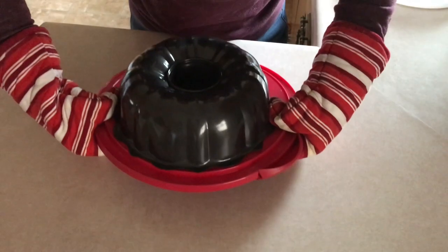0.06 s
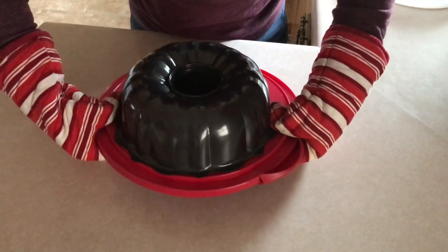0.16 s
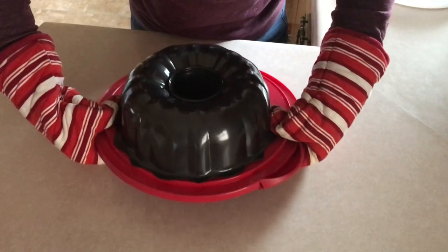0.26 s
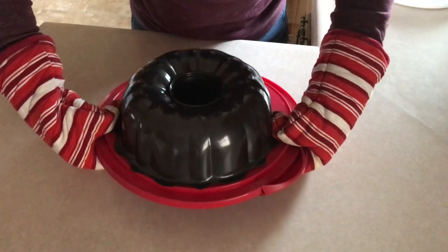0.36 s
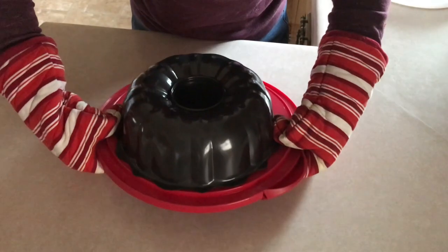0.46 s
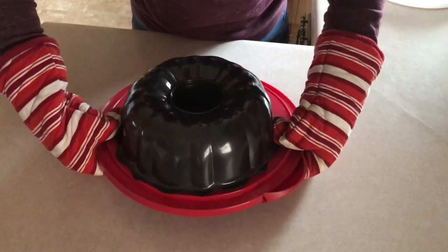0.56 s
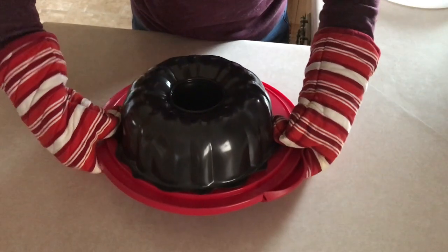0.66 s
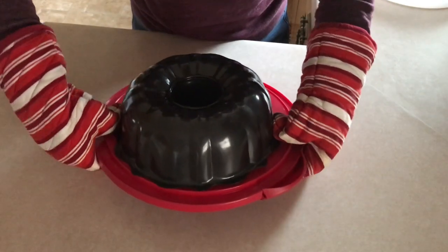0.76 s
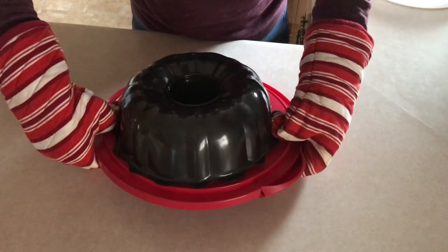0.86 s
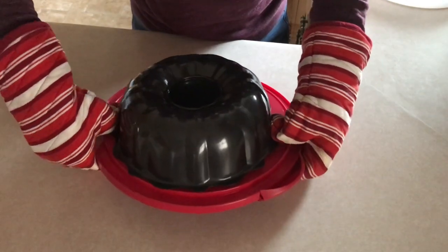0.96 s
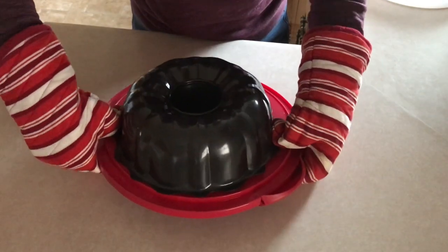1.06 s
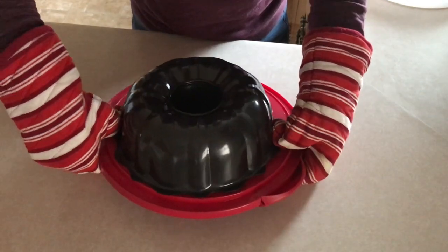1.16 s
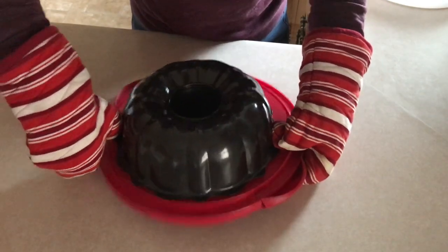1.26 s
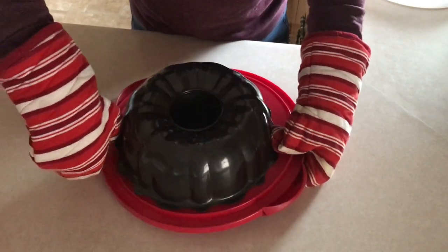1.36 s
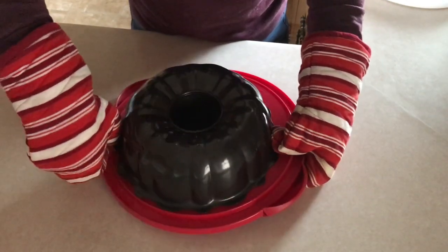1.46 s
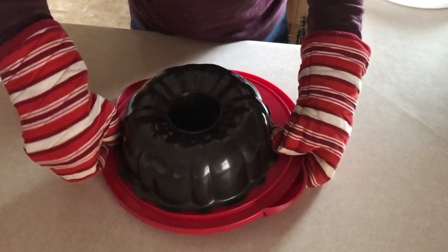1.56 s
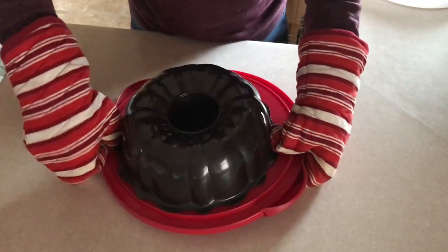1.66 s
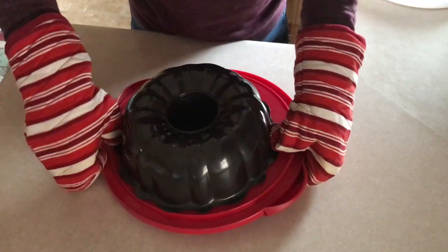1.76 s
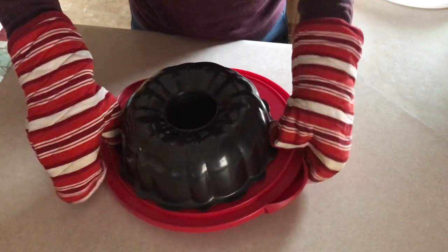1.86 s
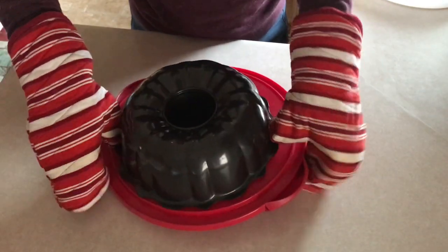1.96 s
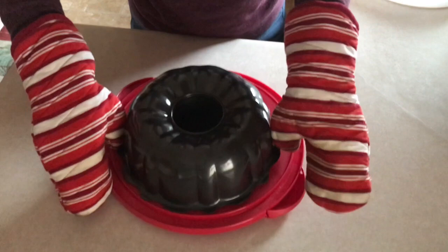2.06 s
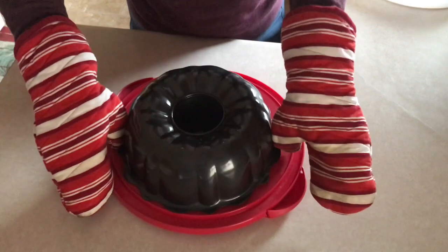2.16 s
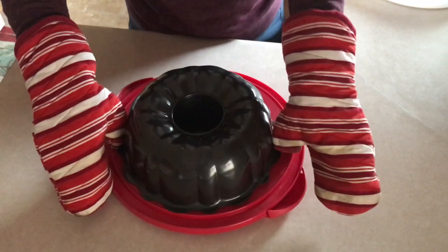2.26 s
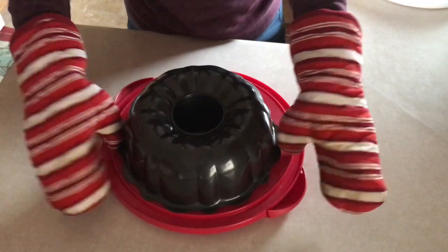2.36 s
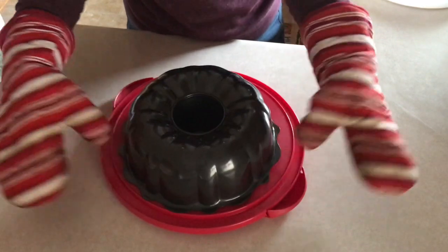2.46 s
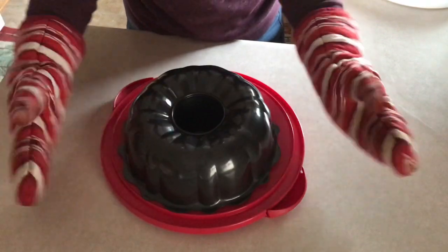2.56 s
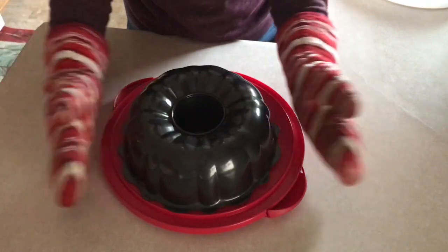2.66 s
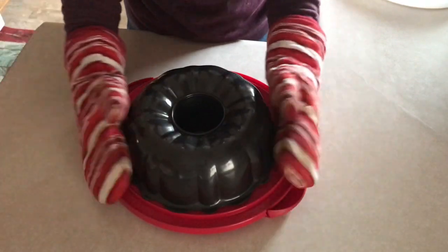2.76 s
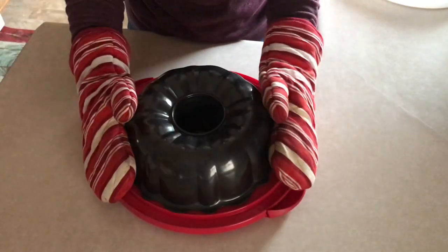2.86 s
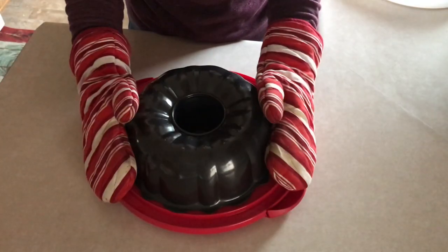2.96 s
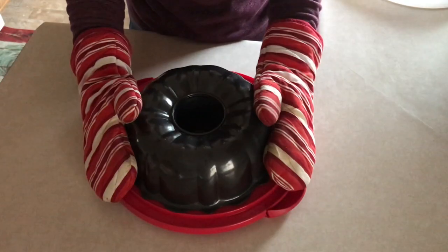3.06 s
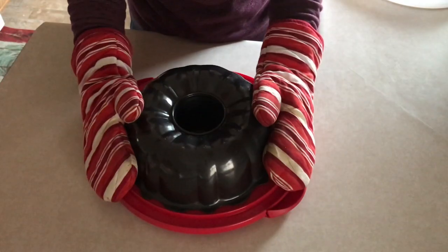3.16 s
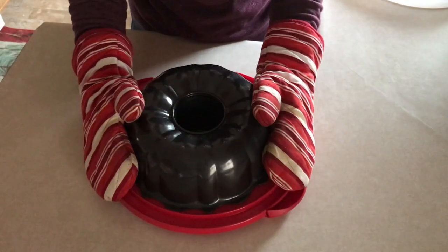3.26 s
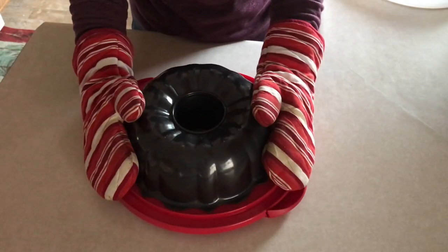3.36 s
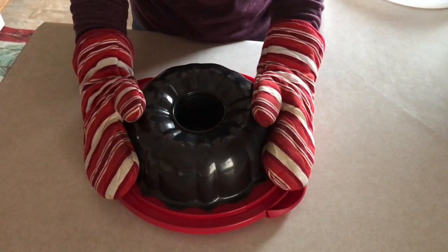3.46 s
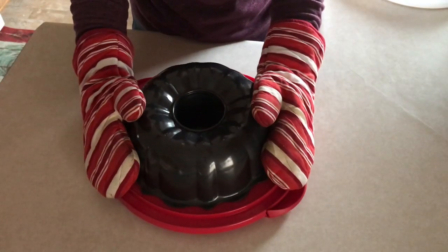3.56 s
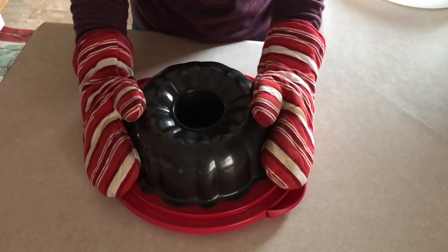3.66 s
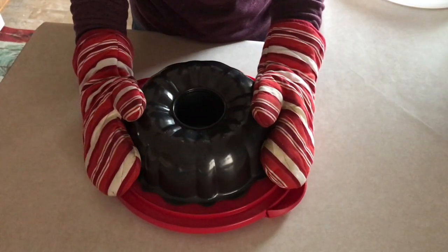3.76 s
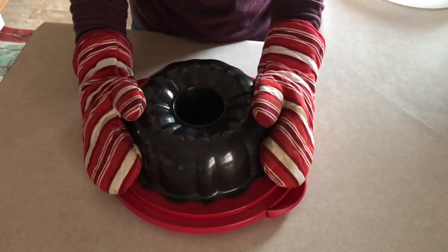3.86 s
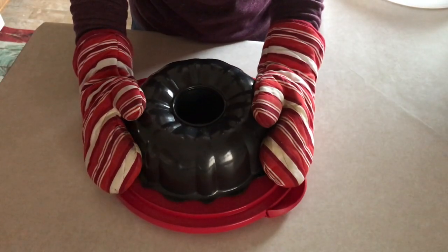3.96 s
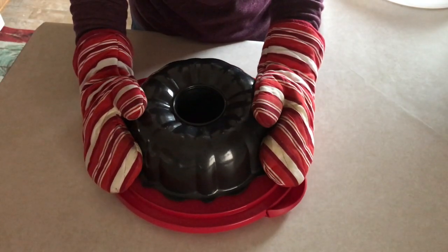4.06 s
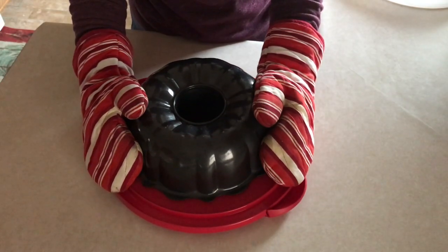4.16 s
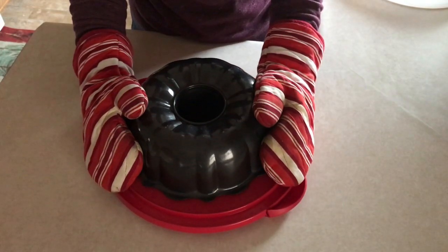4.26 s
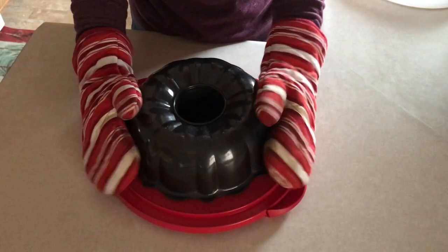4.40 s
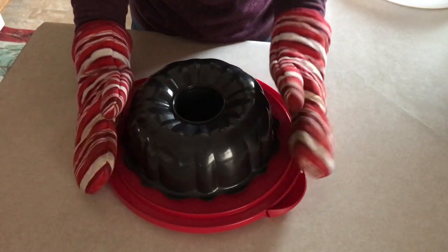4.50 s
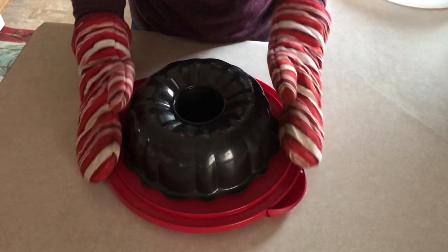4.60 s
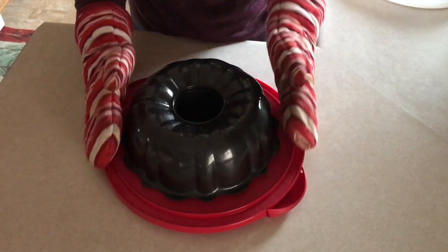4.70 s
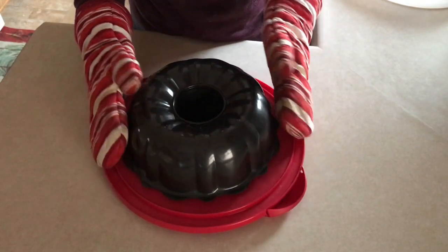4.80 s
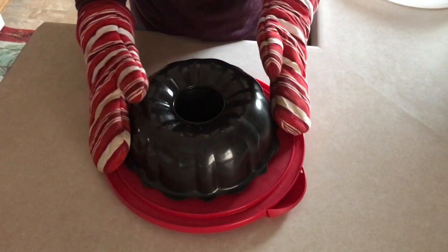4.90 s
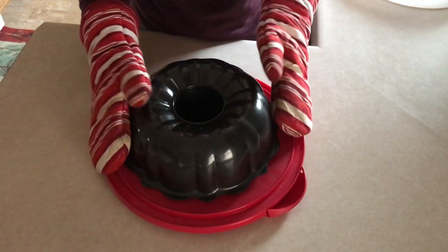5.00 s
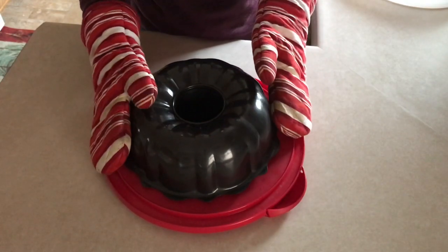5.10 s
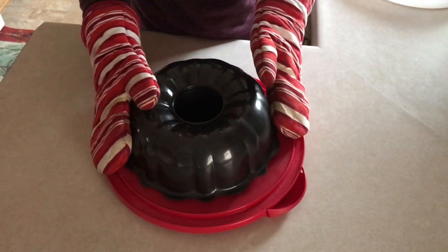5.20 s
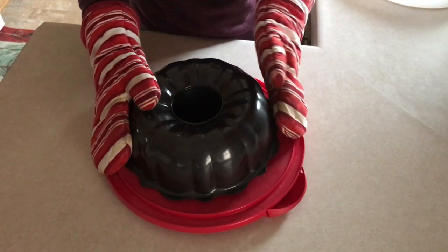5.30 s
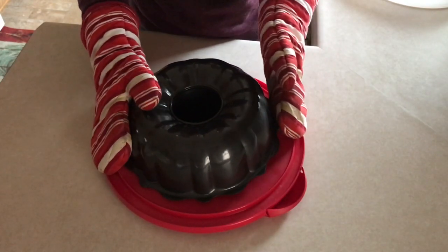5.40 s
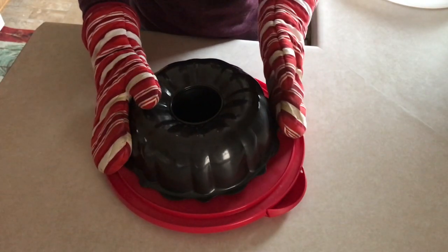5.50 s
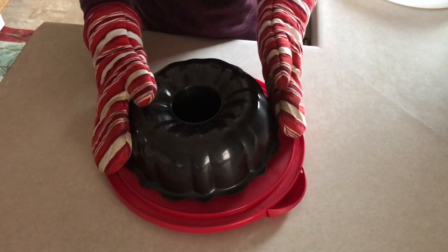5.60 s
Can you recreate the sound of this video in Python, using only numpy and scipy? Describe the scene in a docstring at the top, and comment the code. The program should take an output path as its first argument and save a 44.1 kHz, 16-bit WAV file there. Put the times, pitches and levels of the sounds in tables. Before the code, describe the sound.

A fluted metal cake pan on a plastic lid knocks down onto a papered counter, clatters, drops flat loudly, then faint mitt rustling follows.

```python
"""A fluted metal cake pan, upside down on a plastic lid, is lowered onto a paper-covered kitchen counter.
One edge knocks down, the lid clatters after it, then the pan drops flat as oven mitts slide out from under its rim.
Knocks and touches are band-limited pushes with chatter, ringing the modes of lid and pan; thuds also ring the counter.
Mitts and lid rub over the paper, and cloth sizzles on the pan, as random grains of friction.
The kitchen's echo is noise following the decaying energy of each band; a low rumble is filtered noise."""
import sys
import numpy as np
from scipy import signal
from scipy.fft import rfft, irfft
from scipy.io import wavfile

SR = 44100
rng = np.random.default_rng(int(sys.argv[2]) if len(sys.argv) > 2 else 0)


def transcribe(u):
    """Save the signal u as a 16-bit wav file named by the first command-line argument.

    u: samples, shape (n,) or (channels, n), limited to [-1, 1]; the rate is SR.
    q: integer samples, one column per channel.
    """
    v = np.clip(np.atleast_2d(u).T, -1, 1)
    q = np.round(v * 32767).astype(np.int16)
    wavfile.write(sys.argv[1], SR, q)


N = 248724
TIME = np.arange(N) / SR


def from_db(db):
    """Decibels to amplitude gain."""
    return 10 ** (np.asarray(db) / 20)


def rms_one(x):
    """Scale to rms 1."""
    return x / np.sqrt(np.mean(x ** 2) + 1e-20)


def at_hz(points, hz):
    """Interpolate a table on a log-frequency axis."""
    known_hz, values = np.transpose(points)
    return np.interp(np.log(np.maximum(hz, 1)), np.log(known_hz), values)


def coloured(x, colour):
    """Shape a steady sound's spectrum, rolling off beyond both ends of the table; rms 1."""
    hz = np.arange(N // 2 + 1) * SR / N + 1
    low_end = 1 + (colour[0][0] / hz) ** 6
    high_end = 1 + (hz / colour[-1][0]) ** 6
    gain = from_db(at_hz(colour, hz)) / np.sqrt(low_end * high_end)
    return rms_one(irfft(rfft(x) * gain, N))


def band(x, low_hz, high_hz):
    """Second-order high-pass and low-pass."""
    for edge_hz, kind in ((low_hz, "high"), (high_hz, "low")):
        safe_hz = np.clip(edge_hz, 10, .45 * SR)
        x = signal.sosfilt(signal.butter(2, safe_hz, kind, fs=SR, output="sos"), x)
    return x


def drift(rate_hz):
    """Random line through rate_hz points per second; rms 1."""
    points = rng.standard_normal(1024)
    return rms_one(np.interp(TIME * rate_hz, np.arange(len(points)), points))


def ring(force, modes):
    """Decaying modes set off by a force; each starts with a jump in speed."""
    out = np.zeros(N)
    for hz, db, t60_s in modes:
        radius = np.exp(-np.log(1000) / (t60_s * SR))
        angle = 2 * np.pi * hz / SR
        poles = [1, -2 * radius * np.cos(angle), radius * radius]
        out += from_db(db) * signal.lfilter([.5, 0, -.5], poles, force + 1e-18)
    return out


def add(track, start_s, sound):
    """Mix a short sound in at a time."""
    start = max(round(start_s * SR), 0)
    track[start:start + len(sound)] += sound[:max(N - start, 0)]


def grains(per_s, spread_db):
    """Fibres slip at random, each with its own size; rms 1."""
    size_db = spread_db * np.minimum(rng.exponential(1, N), 4)
    sizes = from_db(size_db) * rng.standard_normal(N)
    return rms_one(sizes * (rng.random(N) < per_s / SR))


def diffuse(x, colour, t60s, build_s):
    """Countless echoes or modes: each band stores its energy and gives it back, dying, as noise."""
    edges_hz = np.geomspace(50, 17000, 25)
    white = rng.standard_normal((2, N))   # neighbouring bands alternate
    out = np.zeros(N)
    for k, (low_hz, high_hz) in enumerate(zip(edges_hz, edges_hz[1:])):
        sos = signal.butter(2, [low_hz, high_hz], "band", fs=SR, output="sos")
        centre_hz = np.sqrt(low_hz * high_hz)
        decay_s = at_hz(t60s, centre_hz) / (2 * np.log(1000))   # energy time constant
        energy = signal.sosfilt(sos, x) ** 2
        for seconds in (build_s, decay_s):
            keep = np.exp(-1 / (seconds * SR))
            energy = signal.lfilter([1 - keep], [1, -keep], energy + 1e-20)
        carrier = rms_one(signal.sosfilt(sos, white[k % 2]))
        out += from_db(at_hz(colour, centre_hz)) * np.sqrt(energy) * carrier
    return out


def rumble():
    """Steady noise, strongest in the deep bass."""
    # noise spectrum: f/Hz, relative level/dB
    floor_colour = [(15, -33.5), (25, -7.5), (49, 4.5), (74, 3.5), (166, -12), (317, -12), (503, -24),
                    (1290, -24), (4250, -32), (7710, -41), (8830, -33.5), (10400, -40), (12900, -33.5),
                    (16000, -46.5)]
    level_db = -65.5
    return from_db(level_db) * coloured(rng.standard_normal(N), floor_colour)


def mitts(rub_db, hiss_db, flutter_db):
    """Cloth and plastic drag over paper: a dull rub and a grainy hiss swell and flutter together."""
    # strokes of mitts and lid: middle/s, length/s, rub level/dB re rub_db, hiss above rub/dB before gains
    strokes = [(0.488, 0.34, -73, -9), (0.777, 0.19, -65.5, -11.5), (0.909, 0.43, -66.5, -12),
               (1.299, 0.4, -56.5, -14), (1.83, 0.51, -72.5, -5), (2.114, 0.23, -53, -9),
               (2.342, 0.36, -64, -8), (2.49, 0.099, -72, 4.5), (2.88, .14, -67, -17), (3.2, 0.21, -71, -7),
               (3.4, 0.39, -72.5, -9.5), (3.666, 0.33, -67, -11), (3.905, 0.27, -65, -10.5),
               (4.26, 0.084, -70, -2.5), (4.54, 0.16, -71, -3.5), (4.782, 0.46, -79, -0.5),
               (5.318, 0.29, -72, -7)]
    # spectra of rub and hiss: f/Hz, relative level/dB
    rub_colour = [(130, -14.5), (270, -2), (420, -5.5), (580, -1), (770, -4.5), (1300, -0.5), (2100, -7.5),
                  (3600, -12), (5000, -21)]
    hiss_colour = [(2500, -9), (4300, -1.5), (6500, -5), (9000, -8.5), (10300, -13.5), (13000, -7),
                   (16000, -11)]
    curve = 1.9   # steepness of a stroke's bell
    rub, hiss = from_db(-82.5), from_db(-87.5)   # cloth between strokes, before gains
    for middle_s, length_s, db, above_db in strokes:
        drag = from_db(db) * np.exp(-curve * (2 * (TIME - middle_s) / length_s) ** 2)
        rub = np.hypot(rub, drag)
        hiss = np.hypot(hiss, from_db(above_db) * drag)
    flutter = from_db(flutter_db * drift(rate_hz=62))
    coarse = coloured(grains(per_s=7000, spread_db=2.5), rub_colour)
    fine = coloured(grains(per_s=20000, spread_db=2), hiss_colour)
    return flutter * (from_db(rub_db) * rub * coarse + from_db(hiss_db) * hiss * fine)


def contact(db, hz, spread, chatter_ms, push_db, chatter_db):
    """Push and brief chatter in a steep-sided band; a hard edge gives only highs, a flat landing only lows."""
    t = TIME[:4096]
    chatter = rng.standard_normal(len(t)) * np.exp(-1000 * t / max(chatter_ms, .1))
    blow = from_db(db + push_db) * (t == 0) + from_db(db + chatter_db) * chatter
    edges_hz = hz / spread, hz * spread
    return band(band(blow, *edges_hz), *edges_hz)


def disperse(x):
    """Bending waves arrive late near certain pitches: all-passes smear a push into a short flutter."""
    # late-arriving bands: f/Hz, width/Hz
    bending = [(1050, 600), (3100, 730), (6800, 370)]
    for hz, width_hz in bending:
        radius = np.exp(-np.pi * width_hz / SR)
        poles = np.array([1, -2 * radius * np.cos(2 * np.pi * hz / SR), radius * radius])
        x = signal.lfilter(poles[::-1], poles, x)
    return x


def knocks(push_db, chatter_db, crack_db, ring_db, wash_db):
    """Clicks, thuds and touches drive lid and pan; only thuds carry weight into the counter."""
    # rim click, then thud of the weight: t/s, click level/dB, click f/Hz, thud lag/ms,
    # thud level/dB, thud f/Hz, chatter decay/ms, thud's pan share/dB, thud's counter share/dB
    knock_rows = [ (0.5124, -16.5, 3400, 6.6, 0, 720, 0.45, -35, -17.5),
                  (1.3357, -20, 4500, 0.32, -14.5, 950, 5.2, 7.5, -1),
                  (1.345, -16, 6500, 0.39, -3.5, 860, 2.3, 8, 1.5),
                  (1.368, -15.5, 5500, 2.3, -20.5, 900, 4.6, -20, -4),
                  (1.3755, -4, 4700, 0.85, -5, 950, 1.38, 7, -22.5),
                  (1.388, -9, 3400, 0.98, -4, 809, 0.88, -13, -6.5),
                  (1.4102, -28.5, 3400, 2.4, -15.5, 780, 2.9, -7.5, -0.5),
                  (2.0489, -27, 5500, 2.34, -23.5, 260, 6.3, -13.5, -16.5),
                  (2.106, -24.5, 1400, 9.6, -14.5, 520, 7.5, -10, -8),
                  (2.1215, 5, 6500, 4.5, 2, 1900, 2.4, 4.5, -8.5),
                  (2.127, -1, 3600, 2.0, 2.5, 500, 1.5, 0, 2),
                  (2.1320, -15, 3000, 2.5, -2, 370, 1.16, -3, -2.5),
                  (2.192, -17, 6500, 1.5, -10.5, 260, 2.1, -9, -7),
                  (2.8747, -29.5, 5200, 2.7, -27.5, 520, 1.93, -3.5, -20.5),
                  (4.6900, -42.5, 3300, 5.6, -38.5, 540, 10.5, -8, -14)]
    # light touches of mitt and lid: t/s, force level/dB, f/Hz
    touch_rows = [(0.055, -47.5, 785), (0.127, -62.5, 790), (0.2974, -51, 2540), (1.1545, -42.5, 3180),
                  (1.1806, -35.5, 7050), (1.296, -35, 513), (1.497, -29, 3500), (1.7071, -42.5, 1110),
                  (2.34, -28, 240), (4.516, -40, 1289), (5.5143, -43.5, 210)]
    # modes of loaded lid, cake-damped pan and counter top: f/Hz, relative level/dB, t60/s
    lid_modes = [(268, -19, 0.044), (326, -21.5, .07), (385, -19.5, 0.049), (499, -17.5, 0.036),
                 (622, -17, 0.05), (790, -23, 0.025), (943, -19, 0.024), (1060, -17.5, 0.043),
                 (1150, -19.5, 0.016), (1473, -23.5, 0.035), (1675, -23, 0.041), (1960, -30.5, .018),
                 (2520, -19.5, 0.0092), (3120, -17.5, 0.015), (3484, -22, 0.0077), (4220, -29.5, .01),
                 (5750, -24.5, .008), (6670, -20, 0.0026), (8560, -24, 0.007), (11900, -20.5, 0.0033),
                 (13800, -23, .003)]
    pan_modes = [(328.1, -38.5, 0.24), (410, -43, 0.42), (496, -42.5, 0.17), (622, -44, .24),
                 (1063, -45, 0.26), (1190, -40, 0.27), (1544, -44.5, 0.35), (1960, -47, 0.3),
                 (2080, -46, 0.16), (2940, -44.5, 0.17), (2996, -39.5, .16), (3150, -42.5, 0.18),
                 (3284, -43, .12), (3500, -39.5, 0.23)]
    counter_modes = [(66, -30.5, 0.45), (126.7, -39.5, 0.55), (146.3, -41.5, 0.11), (254, -45.5, 0.028)]
    # pan's crowd of weaker modes: f/Hz, relative level/dB; then f/Hz, t60/s
    wash_colour = [(125, -4), (260, 5), (490, -1), (860, -9.5), (1350, -5.5), (2250, -2.5), (3650, -1.5),
                   (4700, -13), (6800, -12.5), (14500, -16)]
    wash_t60 = [(280, 0.46), (3300, 0.12), (13500, 0.18)]
    # spread: band edges at f / spread and f * spread
    click_spread, thud_spread, touch_spread = 2, 2.1, 2.7
    click_pan_db, touch_pan_db, touch_chatter_ms = -1.5, -5.5, 3

    on_lid, on_pan, on_counter = 1e-12 * rng.standard_normal((3, N))
    contacts = []
    for s, click_db, click_hz, lag_ms, thud_db, thud_hz, chatter_ms, pan_db, counter_db in knock_rows:
        landing_s = s + lag_ms / 1000
        contacts.append((s, click_db, click_hz, click_spread, chatter_ms, click_pan_db))
        contacts.append((landing_s, thud_db, thud_hz, thud_spread, chatter_ms, pan_db))
        add(on_counter, landing_s, from_db([thud_db + counter_db]))
    for s, db, hz in touch_rows:
        contacts.append((s, db, hz, touch_spread, touch_chatter_ms, touch_pan_db))
    for s, db, hz, spread, chatter_ms, pan_db in contacts:
        force = contact(db, hz, spread, chatter_ms, push_db, chatter_db)
        add(on_lid, s, force)
        add(on_pan, s, from_db(pan_db) * force)

    lid = disperse(ring(on_lid, lid_modes) + from_db(crack_db) * on_lid)
    pan_ring = from_db(ring_db) * ring(on_pan, pan_modes)
    pan_wash = from_db(wash_db) * diffuse(on_pan, wash_colour, wash_t60, build_s=.002)
    counter = band(ring(on_counter, counter_modes), low_hz=44.7, high_hz=600)
    return lid + pan_ring + pan_wash + counter


def pressure():
    """Mitts press on the pan's wall: the grip tightens, relaxes and lets go, never quite even."""
    start_s, firmest_s, end_s, fade_s = 3.4, 3.876, 4.3, .03
    tighten_db_per_s, relax_db_per_s = 11, 24
    firmest_db, waver_db = -74, 4   # before waver and the gains in grip()
    late_s = TIME - firmest_s
    held = np.clip(np.minimum(TIME - start_s, end_s - TIME) / fade_s, 0, 1)
    slope_db = np.minimum(tighten_db_per_s * late_s, -relax_db_per_s * late_s)
    return held * from_db(firmest_db + slope_db + waver_db * drift(rate_hz=10))


def grip(sizzle_db, snag_db, snag_s, dull_db, shuffle_db):
    """Weave creeps over the pan's coating with a thin sizzle; padding shuffles; threads snag."""
    # cloth catching on the pan: t/s, level/dB re snag_db
    snags = [(3.4138, -44), (3.6272, -40), (3.697, -33), (3.7284, -40), (3.8531, -34.5), (4.0004, -41),
             (4.262, -37.5)]
    creep = pressure()
    slips = from_db(sizzle_db) * creep * grains(per_s=2000, spread_db=3.5)
    t = TIME[:1024]
    for s, db in snags:
        burst = rng.standard_normal(len(t)) * np.exp(-t / snag_s)
        add(slips, s, from_db(db + snag_db) * burst)
    thin = ring(slips, [(13220, -16.0, 0.002)])   # f/Hz, level/dB, t60/s
    dull = from_db(dull_db) * band(slips, low_hz=3000, high_hz=10800)
    padding = rms_one(band(rng.standard_normal(N), low_hz=211.0, high_hz=339))
    return thin + dull + from_db(shuffle_db) * creep * padding


def kitchen(near):
    """Small room: diffuse echo of knocks and grip, with its own decay in each band."""
    # echo spectrum: f/Hz, level/dB
    room_echo = [(64, -15.5), (150, -7), (320, -10), (600, -11.5), (1120, -13.5), (2050, -11.5),
                 (3750, -8.5), (5400, -9.5), (9100, -14.5), (14200, -12)]
    # decay: f/Hz, t60/s
    room_t60 = [(110, 0.34), (320, 0.26), (750, 0.48), (1600, 0.47), (3600, 0.38), (7200, 0.29),
                (14500, 0.28)]
    return diffuse(near, room_echo, room_t60, build_s=0.0019)


def scene():
    """Knocks and grip with their echo, plus rubbing cloth and rumble."""
    struck = knocks(push_db=-5.5, chatter_db=-18.5, crack_db=-12.0, ring_db=2.5, wash_db=11.5)
    gripped = grip(sizzle_db=7, snag_db=-4, snag_s=.0015, dull_db=-10, shuffle_db=4)
    near = struck + gripped
    cloth = mitts(rub_db=1.2, hiss_db=2.5, flutter_db=1.5)
    return (near + kitchen(near) + cloth + rumble())[None]


def record(dry):
    """Microphone sheds the deepest bass, rounds the loudest peaks and cuts the top."""
    ceiling, cutoff_hz = .8, 16000
    heard = signal.sosfilt(signal.butter(2, 32, "high", fs=SR, output="sos"), dry)
    rounded = ceiling * np.tanh(heard / ceiling)
    return signal.sosfilt(signal.ellip(10, .1, 80, cutoff_hz, fs=SR, output="sos"), rounded)


dry = scene()
out = record(dry)
transcribe(out)
```